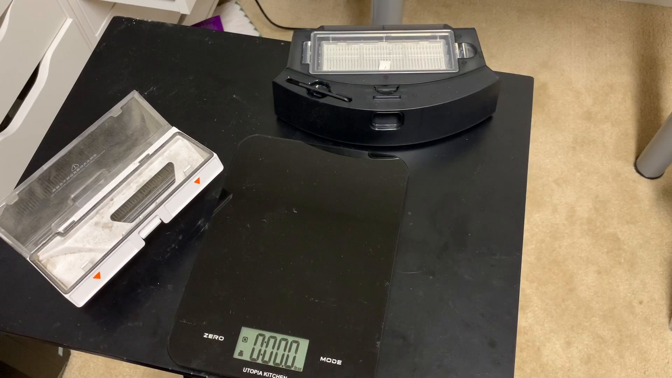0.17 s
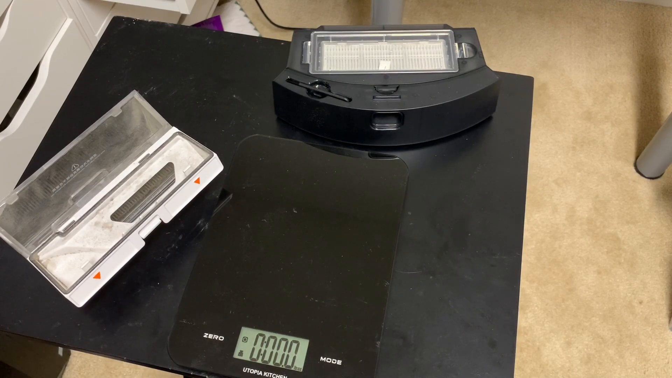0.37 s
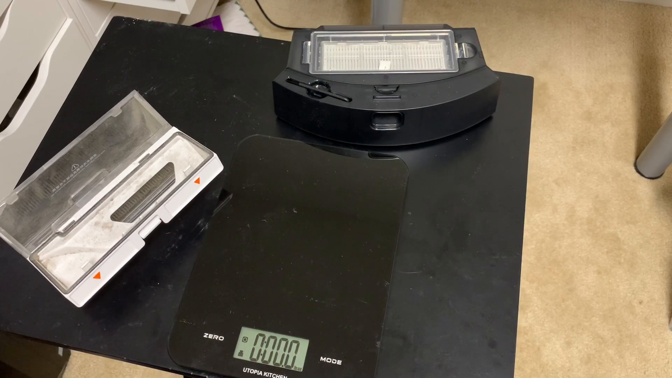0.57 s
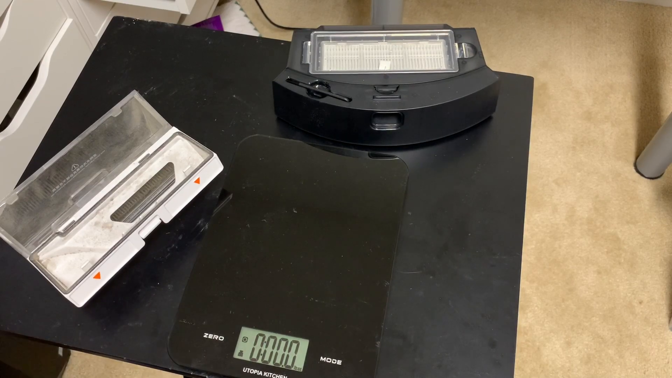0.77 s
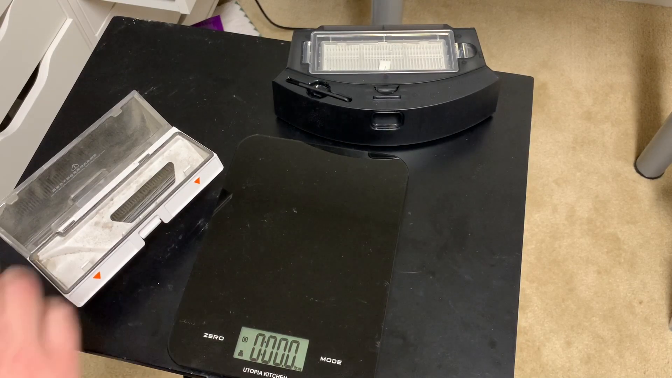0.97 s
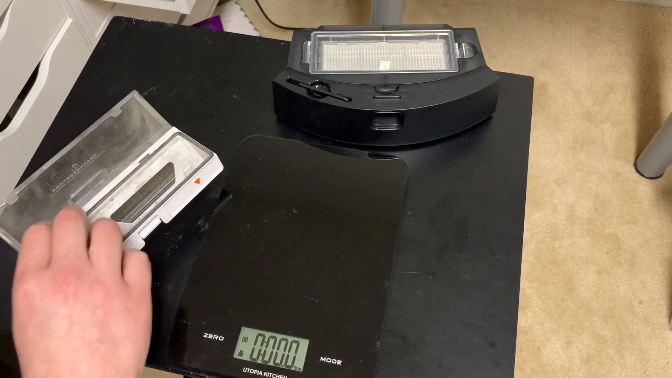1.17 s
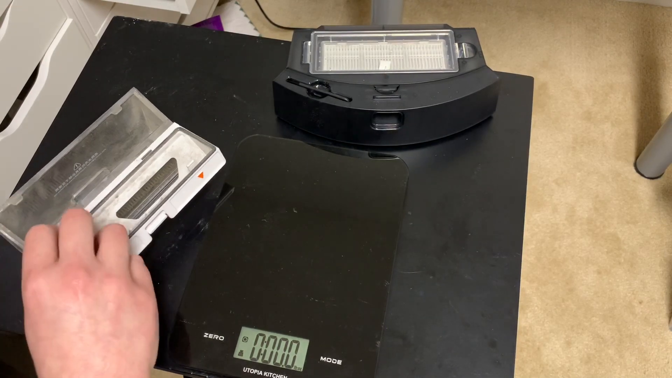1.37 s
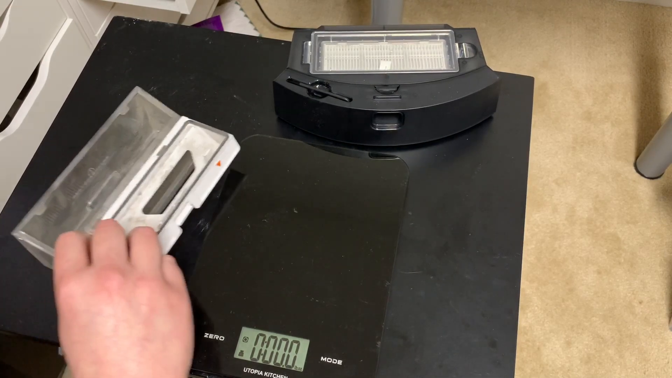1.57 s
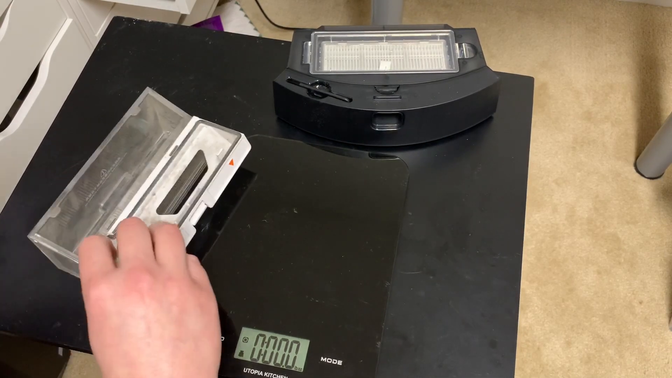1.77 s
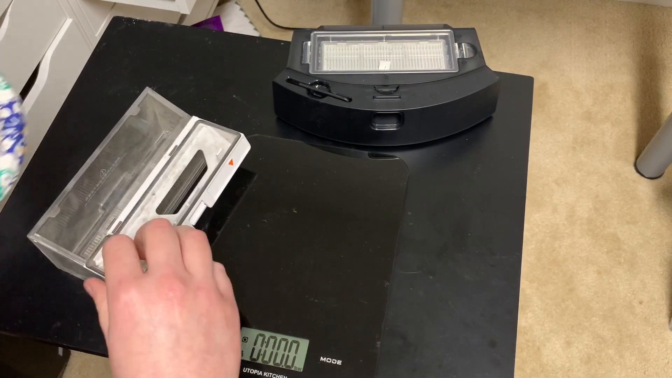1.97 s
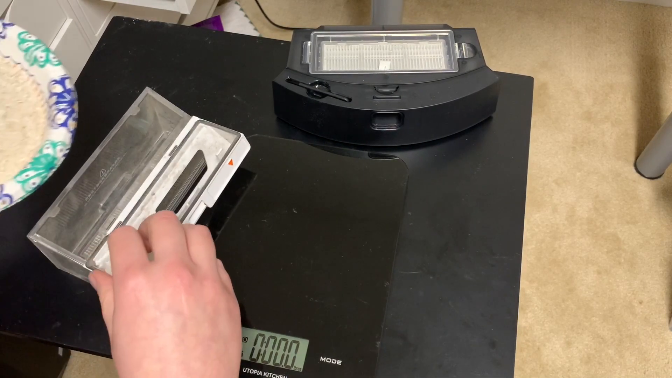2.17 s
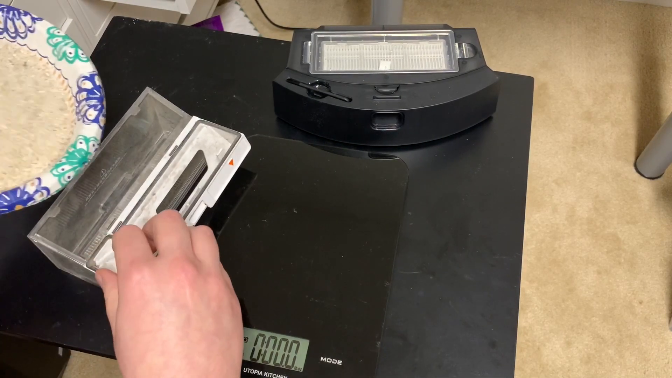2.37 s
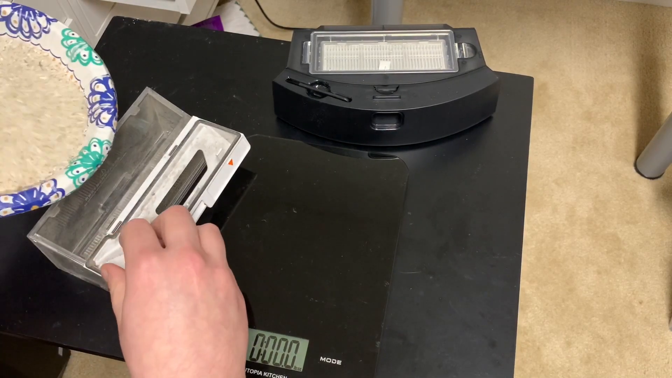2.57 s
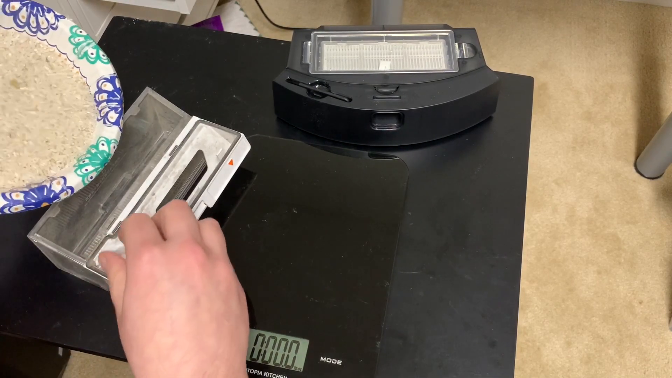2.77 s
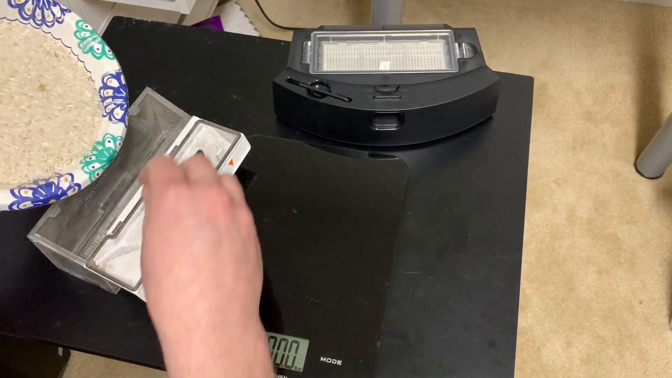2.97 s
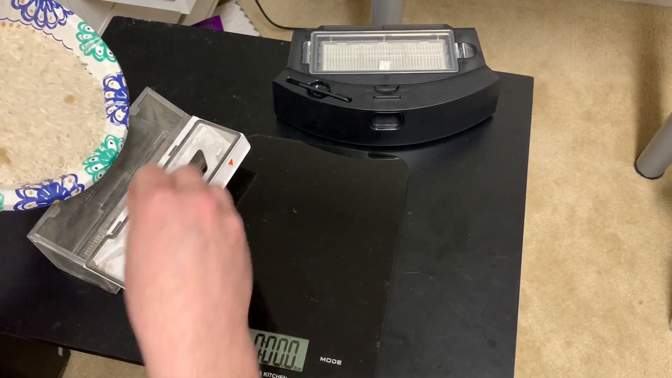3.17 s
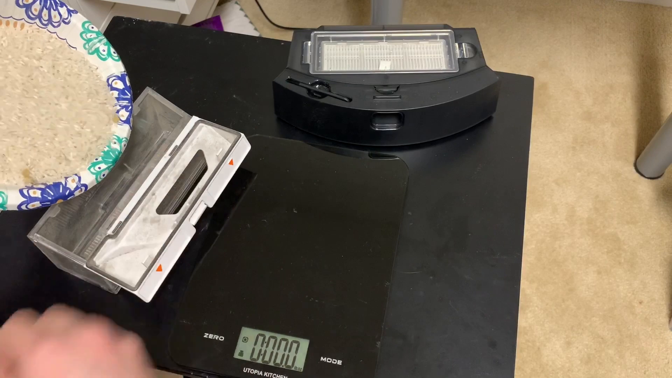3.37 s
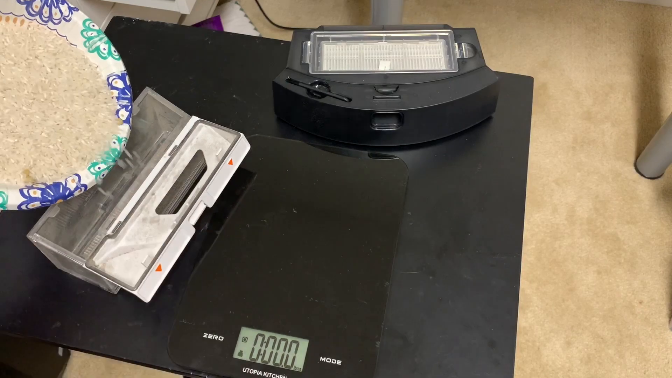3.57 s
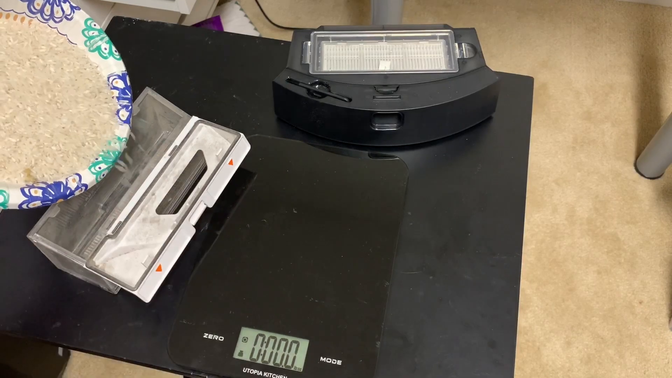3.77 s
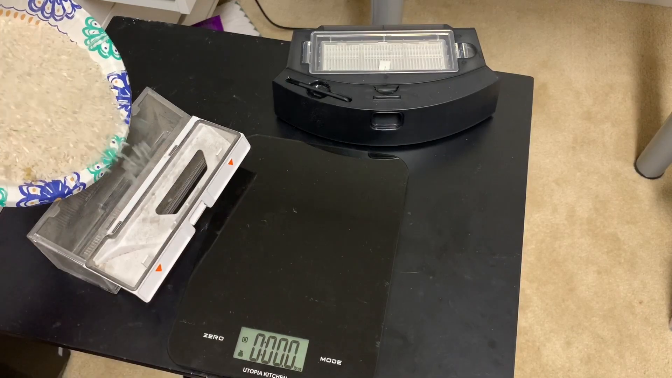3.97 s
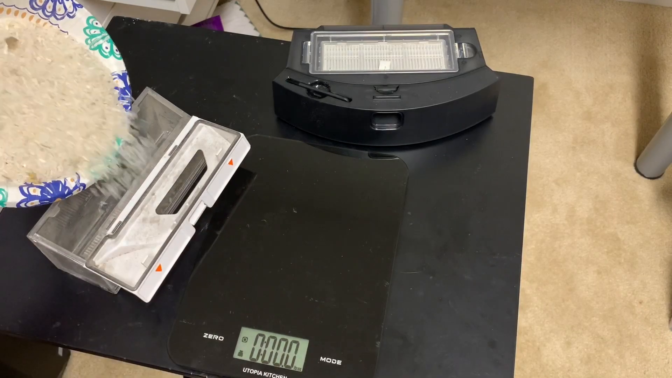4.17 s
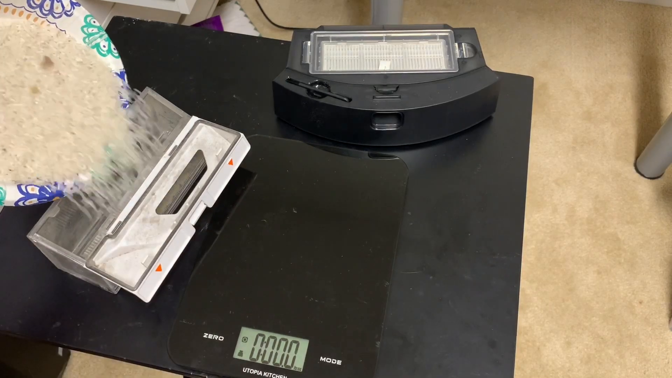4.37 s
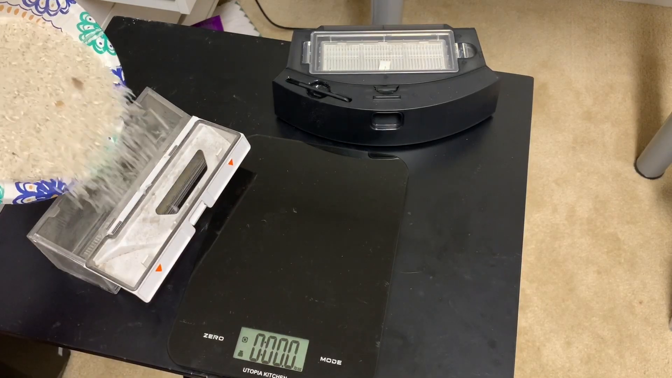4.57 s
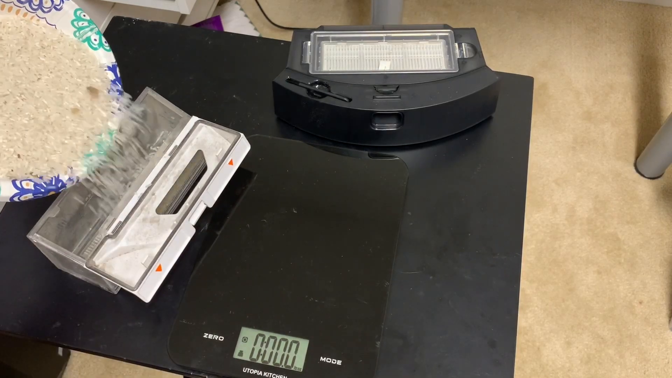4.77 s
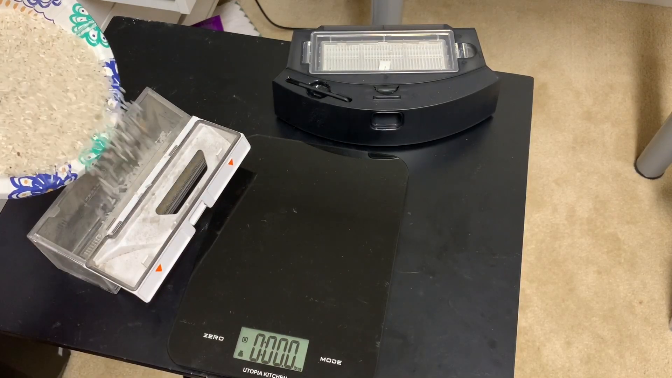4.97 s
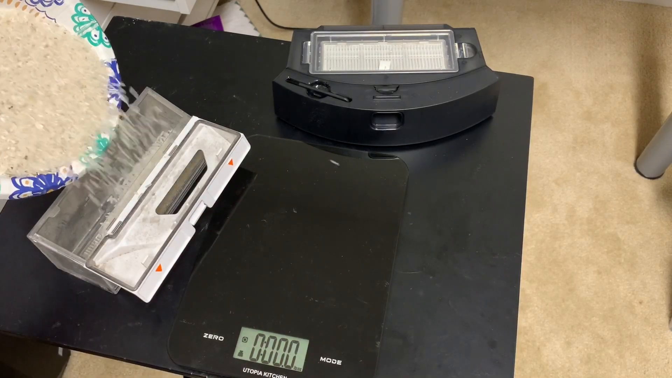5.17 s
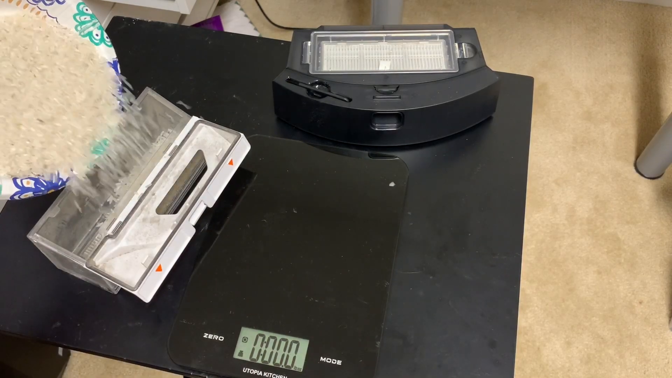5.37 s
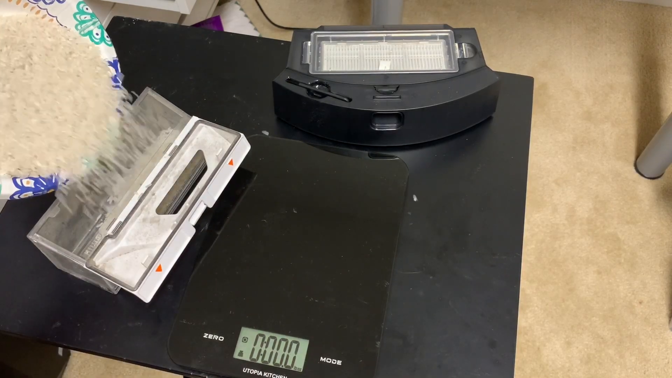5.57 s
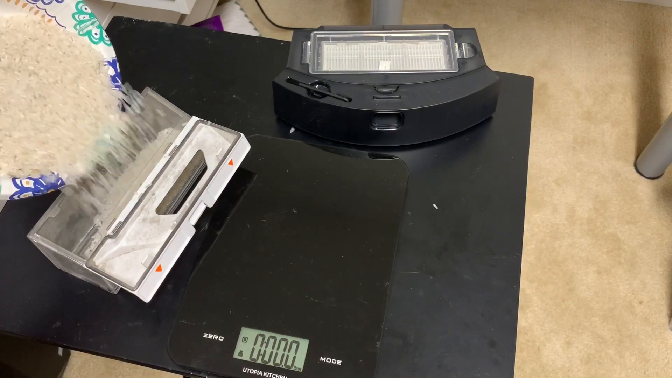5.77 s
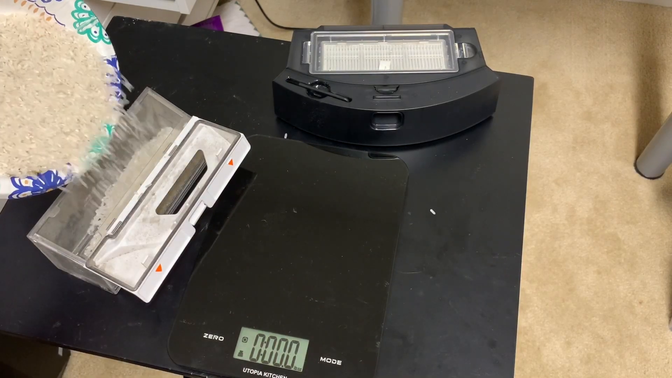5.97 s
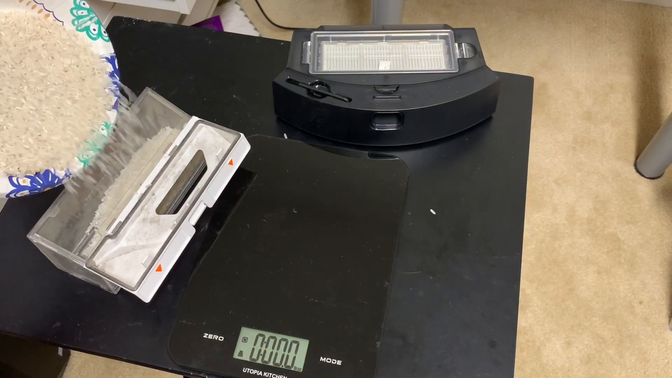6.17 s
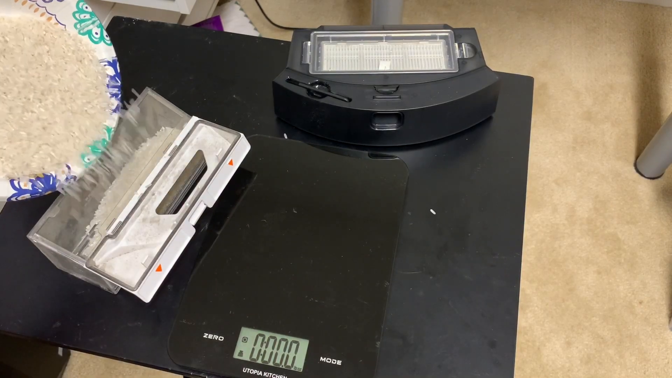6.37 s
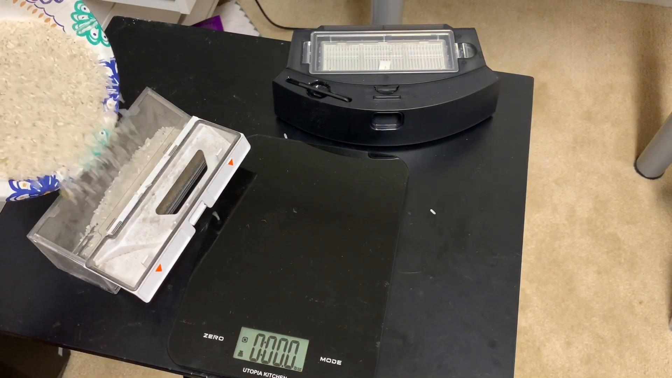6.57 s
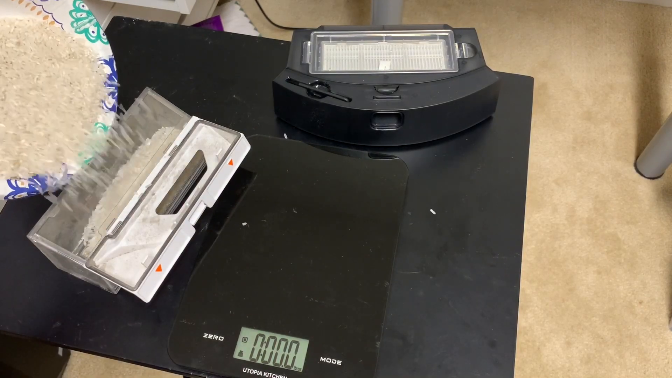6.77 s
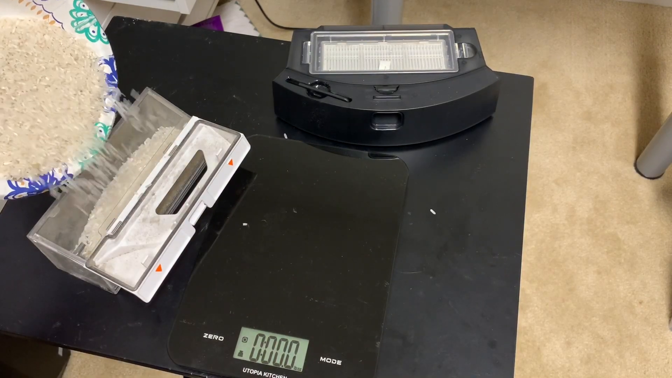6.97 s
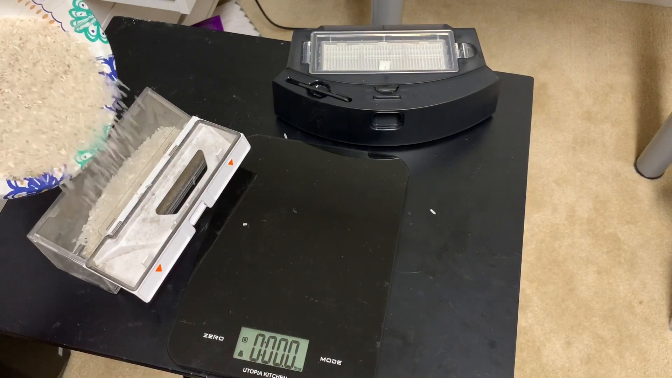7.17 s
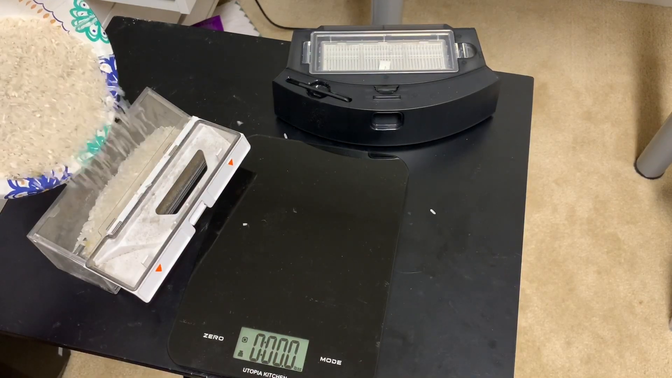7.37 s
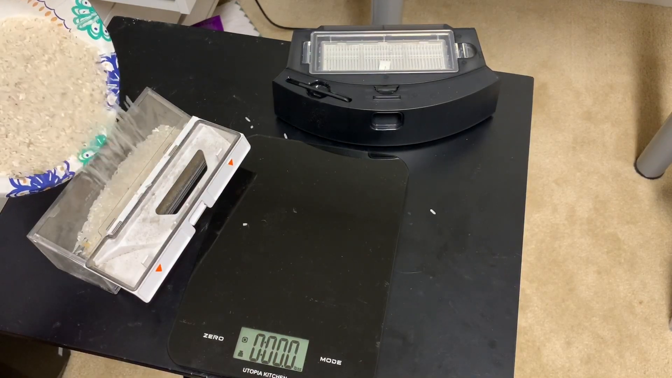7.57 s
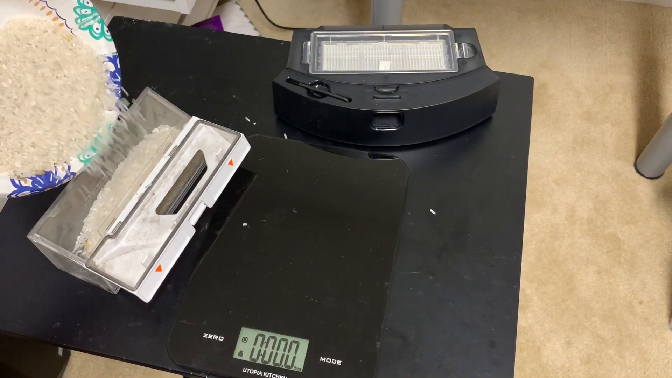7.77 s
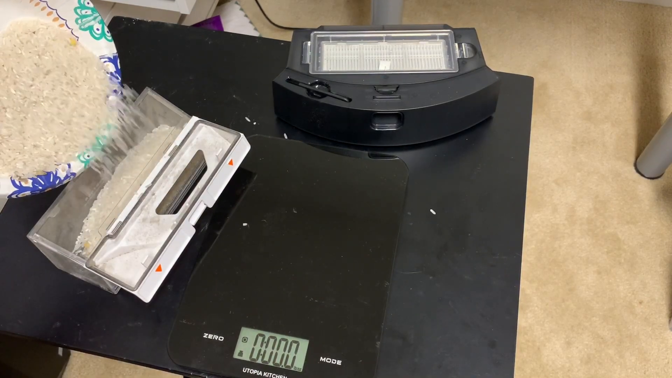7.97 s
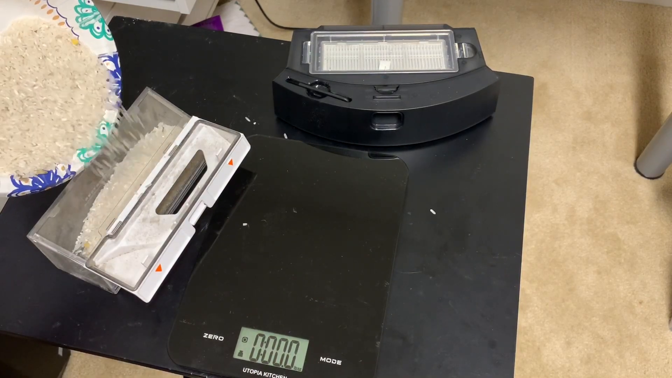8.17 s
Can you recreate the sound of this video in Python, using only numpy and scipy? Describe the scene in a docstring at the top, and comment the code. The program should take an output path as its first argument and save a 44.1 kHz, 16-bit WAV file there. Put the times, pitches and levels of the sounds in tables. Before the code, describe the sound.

In a quiet room with faint low rumble, soft rubbing and dull thuds lead to a plastic bin being dragged and bumped on a table, with a short lid creak. Rice then shifts crisply on a paper plate and spills into the empty bin, ringing its hollow plastic before swelling into a dense hiss and thinning to uneven bright ticks. Close stereo pickup from above.

```python
"""Low room rumble and hum; a hand slides a small plastic bin across a table, then tips in a paper plate of dry rice.
Grains shift on the plate, ring the empty bin, then hiss onto the growing heap; single clear grains tick.
Slips, grains and blows are clicks or noise bursts, shaped by resonances and spectra; the room is noise and sines.
A phone with two microphone ports listens from above: sources are pairs (common part, part differing between ports).
Table levels are relative dB: each player adds its own trim."""
import sys
import numpy as np
from scipy import signal
from scipy.fft import rfft, irfft, next_fast_len
from scipy.io import wavfile
from scipy.ndimage import uniform_filter1d, map_coordinates

SR = 44100
rng = np.random.default_rng(int(sys.argv[2]) if len(sys.argv) > 2 else 0)


def dump_mix(stems):
    """Bounce the given channels to the path in sys.argv[1] as a 16-bit WAV at rate SR."""
    frames = np.atleast_2d(stems).T  # one column per channel
    limited = np.clip(frames, -1, 1)  # hard clip at full scale
    pcm = np.round(limited * 32767).astype(np.int16)
    wavfile.write(sys.argv[1], SR, pcm)


N = 362061


def amp(db):
    """Gain of a level in dB."""
    return 10 ** (np.asarray(db) / 20)


def unit(x):
    """x at rms 1."""
    return x / np.sqrt(np.mean(x ** 2) + 1e-20)


def ramp(t, start, end):
    """0 before start, 1 after end."""
    return np.clip((t - start) / (end - start), 0, 1)


def along(points, hz):
    """Interpolate (freq_hz, value) points on a log frequency axis."""
    point_hz, value = np.transpose(points)
    return np.interp(np.log(hz + 1), np.log(point_hz + 1), value)


def curves(rows):
    """One value per sample for each column after the time, held outside the table."""
    time_s, *columns = np.transpose(rows)
    return [np.interp(np.arange(N) / SR, time_s, column) for column in columns]


def wobble(rate_hz, step=64):
    """Smooth random curve with rate_hz random knots a second."""
    at = np.arange(0, N + step, step)
    knots = rng.standard_normal(int(N * rate_hz / SR) + 4)
    return np.interp(np.arange(N), at, map_coordinates(knots, [at * rate_hz / SR]))


def filtered(x, response):
    """x times a complex response of frequency."""
    size = next_fast_len(N + 8192)
    return irfft(rfft(x, size) * response(np.fft.rfftfreq(size, 1 / SR)), size)[..., :N]


def coloured(x, spectrum):
    """x given a (freq_hz, gain_db) spectrum, at rms 1."""
    return unit(filtered(x, lambda hz: amp(along(spectrum, hz))))


def resonant(x, modes, size=8192):
    """x through (freq_hz, width_hz, gain_db) resonances of alternating sign."""
    hz = np.fft.rfftfreq(size, 1 / SR)
    response = 0
    for k, (centre_hz, width_hz, db) in enumerate(modes):
        damping = 1j * hz * width_hz
        response = response + (-1) ** k * amp(db) * damping / (centre_hz ** 2 - hz ** 2 + damping)
    return signal.oaconvolve(x, irfft(response)[None], axes=1)[:, :x.shape[1]]


def struck(x, spectrum, size=4096):
    """Hits given a minimum-phase colour, so that nothing rings before the blow."""
    cepstrum = irfft(np.log(amp(along(spectrum, np.fft.rfftfreq(size, 1 / SR)))))
    cepstrum[1:size // 2] *= 2
    cepstrum[size // 2 + 1:] = 0
    return signal.oaconvolve(x, irfft(np.exp(rfft(cepstrum)))[None], axes=1)[:, :x.shape[1]]


def bursts(s, db, t60_s, size=256):
    """A pair of decaying noise bursts per time, equal in energy before gain; size 1 makes clicks."""
    noise = rng.standard_normal((len(s), 2, size))
    noise *= amp(-60 * np.arange(size) / SR / np.reshape(t60_s, (-1, 1, 1)))
    noise *= amp(db)[:, None, None] / np.linalg.norm(noise, axis=2, keepdims=True)
    at = (np.round(s * SR).astype(int)[:, None] + np.arange(size)).ravel()
    return np.array([np.bincount(at, noise[:, k].ravel(), N + size)[:N] for k in range(2)])


def shower(spread_db, t60_s, rows, count):
    """Grains at random moments while a table lasts, few much louder than the rest; locally rms 1."""
    s = rng.uniform(rows[0][0], min(rows[-1][0], (N - 1) / SR), count)
    size_db = spread_db[(s * SR).astype(int)] * np.minimum(rng.exponential(size=count), 3.0)
    x = bursts(s, size_db, t60_s, size=192)
    return x / np.sqrt(np.abs(uniform_filter1d(np.mean(x ** 2, 0), SR // 8)) + 1e-9)


def patchy(x, depth_db):
    """Random patches of gain in time and frequency, at rms 1."""
    z = signal.stft(x, nperseg=512)[2]
    field = uniform_filter1d(rng.standard_normal(z.shape[1:]), size=3, axis=0)
    field = uniform_filter1d(field, size=5, axis=1)
    return unit(signal.istft(z * amp(depth_db * unit(field)), nperseg=512)[1][:, :x.shape[1]])


POUR_S, POUR_FADE_S = 3.19, 0.54  # first grains leave the plate; crossfade to the bin


def landing(x, on_plate, in_bin):
    """Grains take the plate's colour until the pour starts, then fade to the bin's."""
    falling = ramp(np.arange(N) / SR, POUR_S, POUR_S + POUR_FADE_S)
    return struck((1 - falling) * x, on_plate) + struck(falling * x, in_bin)


# room rumble: time_s, level_db
RUMBLE_LEVEL = [(0, -73), (.1, -69), (.3, -69.5), (.54, -71.5), (.68, -69.5), (.77, -67), (.95, -71),
                (1.02, -74), (1.1, -68), (1.35, -73.5), (1.5, -75), (1.65, -67), (2.67, -67.5), (2.73, -71),
                (3.05, -77), (3.4, -68.5), (4.0, -72), (4.3, -75), (8.21, -78)]
# spectra of rumble and air hiss: freq_hz, gain_db
RUMBLE_SPECTRUM = [(20, -18), (40, 1.5), (65, 2.5), (110, -5), (200, -6.5), (350, -10), (700, -42)]
AIR_SPECTRUM = [(200, 1.5), (500, 4), (900, -2.5), (1500, -4.5), (2500, -5), (5000, -17), (10000, -14.5),
                (16000, -21)]
HUM_HZ, WHINE_HZ = 59.8, 15624
AIR_WAVER_DB = 2.2


def room():
    """House rumble in lumps, mains hum, faint air hiss, thin electric whine: noise and wavering sines."""
    rumble_db, = curves(RUMBLE_LEVEL)
    t = np.arange(N) / SR
    rumble = amp(2.6 * wobble(8)) * coloured(rng.standard_normal((2, N)), RUMBLE_SPECTRUM)
    hum = amp(-7.5 + 1.4 * wobble(3.5)) * np.sin(2 * np.pi * HUM_HZ * t + 0.46 * wobble(3.16))
    hiss = amp(-77.0 + AIR_WAVER_DB * wobble(13)) * coloured(rng.standard_normal((2, N)), AIR_SPECTRUM)
    whine = amp(-86.0 + 1.4 * wobble(4.9)) * np.sin(2 * np.pi * WHINE_HZ * t + 1.3 * wobble(45))
    common_only = [[1], [0]]
    return amp(rumble_db) * (rumble + hum * common_only) + hiss + whine * common_only


# strokes of hand and sleeve: start_s, length_s, level_db, bright_db, squeal_db (both re level), squeal_hz
STROKES = [(0.05, 0.22, -69.5, -7.5, -1, 1920), (0.26, 0.16, -77, -7, 6.5, 1930),
           (0.418, 0.095, -76.5, -8, -2, 2100), (0.502, 0.31, -79, -25, 2, 1500),
           (0.701, 0.11, -78.5, -34, 3, 1920), (0.79, 0.16, -67.5, -14, 3.5, 1960),
           (1.227, 0.2, -65.5, -7, -23, 2400), (1.39, 0.33, -63, -1, 1, 2300),
           (1.606, 0.27, -70, -1.5, -1, 2300), (0.9, 0.11, -84, -6, -4, 2100),
           (1.9, 0.084, -81, -18, -5, 2300), (2.047, 0.16, -72, -5, -14, 2300)]
# rubbing spectra, main, bright and low drag: freq_hz, gain_db
CLOTH = [(400, -25), (1300, -10), (1900, -1), (2400, 4), (3000, -2), (3700, -3.5), (5200, -13), (7000, -61)]
CLOTH_HIGH = [(2500, -31), (4000, -7.5), (6000, 1.5), (7800, -6), (9000, 0), (10500, -4.5), (13000, -9),
              (16000, -12.5)]
CLOTH_LOW = [(200, -1), (500, -7), (1100, 4), (1600, -13), (2200, -58)]
STROKE_EDGE_DB = 17.5  # a stroke's ends lie this far under its middle
DRAG_DB = -7  # low drag re main rub
SQUEAL_WIDTH_HZ = 55


def hand():
    """Skin and cloth rub in clumps of tiny slips; the slips ring the dragged bin's edge."""
    start_s, length_s, db, bright_db, squeal_db, squeal_hz = np.transpose(STROKES)[:, :, None]
    end = round((start_s + 2 * length_s).max() * SR)
    place = 2 * (np.arange(end) / SR - start_s) / length_s - 1  # -1 start, 1 end
    strokes = amp(db - STROKE_EDGE_DB * place ** 2)
    slips = shower(np.full(N, 2.5), 0.057, [(0,), (end / SR,)], count=4000)[:, :end]
    slips = patchy(slips, depth_db=2.5)

    def rubbed(part_db, spectrum):
        return (strokes * amp(part_db)).sum(0) * unit(struck(slips, spectrum))

    rub = rubbed(0, CLOTH) + rubbed(DRAG_DB, CLOTH_LOW) + rubbed(bright_db, CLOTH_HIGH)
    for gain, hz in zip(strokes * amp(squeal_db - 5.5), squeal_hz[:, 0]):
        rub = rub + gain * unit(resonant(slips, [(hz, SQUEAL_WIDTH_HZ, 0)], size=2048))
    return np.pad(amp(1.0) * rub, ((0, 0), (0, N - end)))


# dull thuds through the house floor: time_s, level_db
THUDS = [(0.2, -60), (0.351, -62), (0.475, -52), (0.75, -60), (0.81, -57), (1.63, -60), (3.36, -60),
         (3.53, -61), (4.0, -57)]
# house floor modes: freq_hz, width_hz, gain_db
FLOOR_MODES = [(48, 24, 0), (75, 40, -2)]


def thuds():
    """Clicks ring the low modes of the house floor."""
    s, db = np.transpose(THUDS)
    return resonant(bursts(s, db + 51.5, 1, size=1), FLOOR_MODES)


# bin and fingers bumping the table: time_s, level_db, bright_db (re level), ring_t60_s
BUMPS = [(0.712, -49, -12, 0.2), (0.794, -50, -13, 0.17), (0.88, -51, -13, 0.098),
         (1.028, -48.5, -17.5, 0.33), (1.496, -45.5, -27, 0.18), (1.92, -53, -14, 0.15),
         (2.5647, -45.5, -15, .03), (3.123, -52.5, -11, 0.039)]
# table modes: freq_hz, width_hz, gain_db
TABLE_MODES = [(160, 37, 4.5), (248, 104, 5.5), (343.5, 22, 8.5), (470, 57, -3), (890, 70, -7.5),
               (1490, 61, -13)]
# crack of the bin: freq_hz, gain_db
CRACK_SPECTRUM = [(300, -12), (900, 10.5), (1500, 8), (2500, 8), (3500, -5), (5500, -35)]


def bumps():
    """A click and a decaying burst ring the table; shorter bursts crack on the bin."""
    s, db, bright_db, t60_s = np.transpose(BUMPS)
    blow = bursts(s, db + 30.5, 1, size=1) + bursts(s, db + 31, t60_s, size=8192)
    crack = bursts(s, db + bright_db + 23.5, 0.0092, size=1024)
    crack = crack + bursts(s, db + bright_db + 21.5, 0.4 * t60_s, size=4096)
    return resonant(blow, TABLE_MODES) + struck(crack, CRACK_SPECTRUM)


# lid creaks: time_s, level_db, pitch_hz
CREAKS = [(1.126, -63.5, 1060), (1.232, -68, 1130), (1.299, -60, 1080), (1.308, -57.5, 1090)]


def creaks():
    """The lid creaks: decaying noise rings two modes as short smeared notes."""
    x = np.zeros((2, N))
    size = SR // 10
    for s, db, hz in CREAKS:
        rub = rng.standard_normal((2, size)) * amp(db + 15.5 - 60 * np.arange(size) / SR / 0.1)
        x[:, round(s * SR):][:, :size] += resonant(rub, [(hz, 60, 4), (1.59 * hz, 120, -1)])
    return x


# single clear grain ticks, on the plate, then in the filling bin: time_s, level_db, dull_knock_db (re level)
TICKS = [(1.852, -52, -27), (2.0763, -51, -23.0), (2.241, -33.5, -15), (2.244, -45.0, -14),
         (2.2464, -40, -22.0), (2.287, -37, -20.0), (2.296, -29, -19), (2.301, -35.0, -24.0),
         (2.31, -26.5, -19.0), (2.3413, -23, -24.0), (2.3458, -31, -25.0), (2.3518, -27, -22),
         (2.357, -20.5, -23), (2.3937, -25, -10), (2.4395, -21, -21.0), (2.4424, -22, -22.0),
         (2.4545, -23, -26.0), (2.479, -26, -27.0), (2.4815, -27.0, -31.0), (2.5264, -33, -24.0),
         (2.5985, -27, -25), (2.6167, -26, -17.0), (2.629, -25, -20), (2.636, -26, -21.0),
         (2.664, -30, -21.0), (2.6722, -30, -15.0), (2.6966, -33, -20.0), (2.7318, -35, -17.0),
         (2.738, -35, -0.5), (2.7493, -37, -19), (2.7796, -39.0, -26.0), (2.781, -32, -22.0),
         (2.7868, -29, -20.0), (2.7964, -28.5, -21), (2.8579, -39.5, -27.0), (2.9041, -29, -18.0),
         (2.914, -34, -11), (2.936, -30.5, -22.0), (2.963, -27, -24.0), (2.9725, -45, -21.0),
         (2.9861, -31, -22.0), (3.0052, -25.5, -17), (3.0095, -34, -22.0), (3.012, -26, -23.0),
         (3.016, -33, -14), (3.0354, -26, -14), (3.0762, -29, -18), (3.1001, -43, -19.0),
         (3.1315, -35, -16.0), (3.256, -30.5, -23.0), (3.262, -37, -24.0), (3.3225, -37.0, -28.0),
         (3.3321, -35, -29), (3.39, -36, -18.0), (3.397, -31.5, -30.0), (3.401, -32, -31),
         (3.4293, -28.5, -22.0), (3.4647, -49, -17.0), (3.4821, -36.5, -28), (3.4844, -33, -19),
         (3.491, -29, -6), (3.5, -32, -16), (3.5315, -27, -22), (3.5406, -27, -25.0), (3.693, -18, -20),
         (3.774, -23, -28), (3.8343, -23, -28), (3.9228, -31, -31.0), (3.9867, -15.5, -24),
         (4.064, -18.5, -12), (4.073, -19, -23.0), (4.1628, -23, -25), (4.1748, -21, -25),
         (4.1821, -22, -25), (4.2107, -21, -25), (4.2219, -20, -25), (4.2587, -9.5, -10.5),
         (4.28, -16, -14), (4.287, -20, -25), (4.2973, -11, -14), (4.3094, -24, -25), (4.3239, -20, -25),
         (4.3296, -16.5, -29), (4.3444, -20, -24.0), (4.359, -21, -30.0), (4.3845, -22, -26),
         (4.391, -17, -26), (4.4049, -20, -26), (4.4112, -15, -26), (4.424, -20, -26), (4.4268, -17, -26),
         (4.4448, -8.5, -17), (4.45, -18, -26), (4.46, -18, -23), (4.4663, -21, -26), (4.477, -15, -31.0),
         (4.482, -17, -28), (4.4906, -13, -26), (4.505, -16, -28), (4.5111, -13, -32.0),
         (4.5144, -17, -28.0), (4.5272, -20, -28), (4.5328, -12, -22), (4.5393, -16, -28),
         (4.547, -22, -28), (4.5504, -18, -34.0), (4.5524, -16, -25), (4.5717, -26, -28),
         (4.5832, -24, -28), (4.6045, -25, -30.0), (4.6101, -25, -28), (4.6161, -20, -26.0),
         (4.627, -14.5, -27), (4.6312, -18, -25.0), (4.634, -25, -25.0), (4.655, -19, -20),
         (4.657, -19, -18), (4.67, -14, -21), (4.681, -20, -26), (4.6963, -10.5, -22), (4.7085, -17, -26),
         (4.7112, -22, -24.0), (4.7357, -13, -25), (4.7402, -13, -29), (4.761, -16, -28.0),
         (4.7696, -14, -35.0), (4.79, -18, -22.0), (4.8088, -11, -20), (4.8312, -14.5, -16),
         (4.838, -22, -26), (4.842, -22, -31), (4.875, -20.5, -24), (4.8815, -24, -26),
         (4.9254, -17, -31.0), (4.9412, -20.5, -23.0), (4.96, -16, -27), (4.9753, -11.5, -22),
         (4.983, -35, -22.0), (4.989, -17, -33), (4.992, -18, -18), (5.042, -17, -28.0), (5.044, -20, -27),
         (5.0525, -25, -29.0), (5.0605, -13, -32), (5.0633, -19, -25), (5.0802, -16, -29),
         (5.1053, -20.0, -25.0), (5.114, -18, -31.0), (5.116, -16, -34.0), (5.1258, -21, -32.0),
         (5.1442, -12.5, -24), (5.1676, -17, -22), (5.175, -10, -21), (5.1765, -19, -27.0),
         (5.1863, -17, -27), (5.199, -21, -30), (5.2007, -24, -30), (5.2406, -20, -33.0),
         (5.2556, -20.5, -30), (5.282, -14, -34), (5.3317, -18.5, -25.0), (5.3359, -21.5, -14),
         (5.3497, -21, -30), (5.3672, -15, -30), (5.3753, -19, -27), (5.392, -18, -36.0),
         (5.4176, -17.5, -24), (5.4252, -19.0, -30.0), (5.432, -14, -28.0), (5.4597, -9, -24),
         (5.4907, -15.5, -30), (5.5625, -10.5, -30), (5.565, -12.5, -26.0), (5.5866, -8.5, -29),
         (5.6172, -15.5, -39.0), (5.6303, -19.0, -30.0), (5.637, -14, -30.0), (5.646, -14, -33.0),
         (5.654, -17, -31.0), (5.6628, -19, -33.0), (5.6738, -12, -24), (5.6775, -16, -12),
         (5.722, -18, -32.0), (5.747, -23, -31.0), (5.754, -18, -25), (5.7752, -16.5, -31.0),
         (5.793, -22, -37.0), (5.7955, -16, -27.0), (5.8, -22, -30), (5.829, -22, -30),
         (5.8364, -13.5, -34.0), (5.8583, -12.5, -32), (5.894, -18.5, -38), (5.9721, -13, -39),
         (6.0028, -13.5, -35.0), (6.042, -24, -34.0), (6.1986, -28, -33.0), (6.248, -29, -22.0),
         (6.4367, -14.5, -36), (6.5095, -28.5, -10), (6.568, -31.5, -18), (6.572, -17.5, -33.0),
         (6.608, -14, -35.0), (6.6435, -30, -26.0), (6.6461, -20.5, -25.0), (6.6513, -30.5, -22),
         (6.6733, -17.5, -31.0), (6.717, -16.5, -35.0), (6.792, -27, -27.0), (6.799, -21, -28.0),
         (6.802, -13.0, -30.0), (6.8166, -29.0, -30.0), (6.863, -18.5, -32.0), (6.8695, -19, -27.0),
         (6.885, -14.5, -30), (6.904, -16, -31), (6.9068, -22, -32), (6.922, -16.5, -36.0),
         (6.941, -28, -33.0), (6.952, -23, -26.0), (6.954, -14, -31.0), (6.97, -18.5, -18),
         (7.044, -29, -23.0), (7.0768, -32, -20), (7.0786, -10, -29), (7.1808, -13.5, -28),
         (7.1855, -16.5, -34.0), (7.206, -19, -32.0), (7.212, -24, -34.0), (7.223, -21, -37.0),
         (7.2375, -16, -39), (7.2434, -30, -30.0), (7.247, -21, -35.0), (7.2649, -25, -30),
         (7.2858, -16, -38), (7.2914, -19, -35), (7.3159, -26.0, -22.0), (7.3182, -10.5, -38),
         (7.324, -28.0, -10), (7.3352, -23, -30), (7.359, -14, -37), (7.4913, -40, -32),
         (7.521, -28.5, -28.0), (7.553, -32, -17.0), (7.557, -21, -36.0), (7.6081, -34, -12),
         (7.695, -42, -15), (7.761, -35, -18.0), (7.84, -32, -22.0), (7.89, -19, -32.0), (7.8951, -14, -35),
         (7.953, -17.5, -28.0), (8.064, -30, -13), (8.16, -41, -20.0), (8.1975, -42, -28.0)]
# grain spectra, on the plate, in the bin, dull knock: freq_hz, gain_db
PAPER_SPECTRUM = [(1500, -22.5), (2500, -8), (4000, -10), (6000, -9), (8500, 3.5), (11000, -3.5),
                  (14000, -9), (17000, -16)]
BIN_TICK_SPECTRUM = [(3000, -37.5), (6100, -11), (6450, -11), (6900, -1.5), (7500, -20), (8400, -2),
                     (9100, 6), (9500, -1), (9900, 2), (10800, -3.5), (11700, 0), (12600, -4.5),
                     (14200, -11.5), (17000, -11.5)]
KNOCK_SPECTRUM = [(800, -81), (2500, -21), (4500, 6.5), (6500, -7), (9000, -51)]
# echoes off table and bin wall: delay_s, gain_db
ECHOES = [(.00072, -7), (.0018, -12)]
ECHO_SCATTER = 0.22  # share by which delays differ with the landing spot
PAPER_SOFTENS_DB = -4.5  # click on the plate re click in the bin
KNOCK_T60_S, NEAR_T60_S, FAR_T60_S = .014, .011, .06  # decay rates; bursts are cut short


def ticks():
    """Each grain: a click, its echoes, a short scattered tail and a duller knock."""
    s, db, knock_db = np.transpose(TICKS)
    spot = 1 + ECHO_SCATTER * rng.standard_normal((len(s), len(ECHOES)))
    clicks = [(s, db)]
    for k, (delay_s, loss_db) in enumerate(ECHOES):
        clicks.append((s + delay_s * spot[:, k], db + loss_db))
    paper_db = PAPER_SOFTENS_DB * (s < POUR_S)
    snap = sum(bursts(at_s, click_db + 14.0 + paper_db, 1, size=1) for at_s, click_db in clicks)
    tail = bursts(s, db + 8.5, NEAR_T60_S) + bursts(s, db + 4, FAR_T60_S, size=640)
    knock = struck(bursts(s, db + knock_db + 18.0, KNOCK_T60_S), KNOCK_SPECTRUM)
    return landing(snap + tail, PAPER_SPECTRUM, BIN_TICK_SPECTRUM) + knock


# rice in motion, sliding on the plate, then pouring: time_s, stream_db, patter_db
RICE = [(2.2, -113, -92), (2.25, -66, -91), (2.28, -71, -85), (2.3, -58, -85), (2.35, -55, -48.5),
        (2.42, -51, -45.5), (2.47, -51.5, -49.5), (2.53, -52.5, -44), (2.7, -60.5, -64), (2.78, -64.5, -62),
        (2.855, -73.5, -70), (2.875, -66, -86), (2.92, -56, -75), (2.97, -62.5, -85), (3.07, -53, -64),
        (3.22, -54.5, -48), (3.34, -59.5, -63), (3.54, -57, -59), (3.62, -47, -43), (3.67, -54.5, -75),
        (3.72, -49, -51), (3.921, -55, -52), (3.94, -49, -50.5), (4.41, -40.5, -35), (4.59, -47, -40),
        (4.69, -44, -45), (4.76, -49, -42.5), (5.36, -49.5, -49.5), (5.7, -46.5, -42.5), (5.73, -49, -40.5),
        (6.12, -52.5, -55), (6.45, -53.5, -63), (6.72, -50.5, -54.5), (7.17, -51.5, -54),
        (7.61, -55.5, -66), (7.96, -51.5, -58), (8.21, -57.5, -63)]
# stream spectra, on plate, in bin: freq_hz, gain_db
PLATE_SPECTRUM = [(300, -21), (600, -19.5), (950, -8), (1500, -14), (1900, -10), (2300, -1), (2800, -4.5),
                  (3450, 1), (4300, -5.5), (6000, -5), (8500, -1.5), (12000, -7), (17000, -26)]
STREAM_SPECTRUM = [(150, -55), (350, -13.5), (600, -22.5), (1000, -12), (1800, -13), (2500, -8), (3400, -7),
                   (4200, -5), (4800, -2.5), (5600, -4), (6600, -1.5), (8300, -0.5), (12000, -5.5),
                   (17000, -11)]
LOUD_SPREAD_DB, STREAM_SHARE = 2, .4  # spread of grain loudness; the stream's share of it
SURGE_DB, PATTER_SURGE_DB = 1.2, 2.5  # unevenness in time
STREAM_PATCH_DB = 2.0  # unevenness of colour
GRAIN_T60_S = .011  # decay rate; bursts are cut short


def rice():
    """A dense stream of grains and a sparser patter of bright ticks."""
    stream_db, patter_db = curves(RICE)
    spread_db = np.full(N, LOUD_SPREAD_DB)
    dense = shower(STREAM_SHARE * spread_db, GRAIN_T60_S, RICE, count=8000)
    dense = patchy(dense, depth_db=STREAM_PATCH_DB)
    stream = unit(landing(dense, PLATE_SPECTRUM, STREAM_SPECTRUM))
    sparse = shower(spread_db, GRAIN_T60_S, RICE, count=3000)
    patter = unit(landing(sparse, PAPER_SPECTRUM, BIN_TICK_SPECTRUM))
    stream_gain = amp(stream_db + 5.5 + SURGE_DB * wobble(13))
    patter_gain = amp(patter_db + 1.5 + PATTER_SURGE_DB * wobble(24))
    return stream_gain * stream + patter_gain * patter


# grains on the bin floor as the heap covers it: time_s, bare_ring_db, hollow_db
DRUM = [(3.385, -82, -82), (3.41, -71, -65), (3.5, -64, -73), (3.56, -56, -63.5), (3.73, -49.5, -58.5),
        (3.85, -50.5, -67), (3.91, -58, -65), (3.99, -48.5, -59), (4.17, -48.5, -56), (4.3, -54, -52),
        (4.5, -56, -55), (4.65, -67.5, -61.5), (5.05, -73, -73), (5.68, -63.5, -65), (6.2, -71.5, -76),
        (8.21, -73, -72.5)]
# modes of empty bin, air inside it, loaded floor: freq_hz, width_hz, gain_db
BIN_MODES = [(522, 22, -9), (673, 16, -4), (1345, 28, 5), (1385, 36, 4), (1620, 300, -11), (1972, 24, -10),
             (2488, 24, -6), (2960, 80, -10), (4085, 50, -9), (4720, 120, -11)]
HOLLOW_MODES = [(900, 225, 0), (1180, 196, 3)]
HEAP_MODES = [(321, 113, 1), (486, 26, 1.5)]
HEAP_THUD_DB = -21.5  # re stream
HEAP_START_S, HEAP_END_S = 4, 5.4  # heap thud fades in
RING_PATCH_DB = 2.0  # unevenness of the ring's colour


def drumming():
    """Hard grains ring the bin until the heap damps it; soft ones boom in its air and thud on the heap."""
    bare_db, hollow_db = curves(DRUM)
    with np.errstate(divide="ignore"):  # silent before the heap
        growth_db = 20 * np.log10(ramp(np.arange(N) / SR, HEAP_START_S, HEAP_END_S))
    heap_db = curves(RICE)[0] + HEAP_THUD_DB + growth_db
    hard = patchy(shower(np.full(N, 3), 0.0083, DRUM, count=2600), depth_db=RING_PATCH_DB)
    soft = shower(np.full(N, 2.5), 0.008, DRUM, count=3000)
    layers = [(bare_db - 0.5, hard, BIN_MODES),
              (hollow_db - 2.0, soft, HOLLOW_MODES),
              (heap_db, soft, HEAP_MODES)]
    return sum(amp(db + 1.43 * wobble(14)) * unit(resonant(hits, modes)) for db, hits, modes in layers)


# lone grains on the bare bin floor: time_s, level_db
STRIKES = [(3.4043, -48), (3.4512, -43), (3.4856, -41), (3.4976, -44), (3.533, -38.5), (3.553, -47),
           (3.578, -44), (3.6038, -41), (3.6432, -43), (3.662, -46), (3.6876, -47), (3.7265, -37.5),
           (3.7515, -47), (3.8373, -38), (3.9081, -54), (3.9435, -45), (4.0009, -50), (4.0289, -48),
           (4.0608, -39), (4.1221, -47), (4.1665, -41), (4.2563, -47)]
# rap on the floor: freq_hz, gain_db
RAP_SPECTRUM = [(500, -28), (1200, 1), (1500, 8), (1900, -6), (3000, -20), (5000, -22), (8000, -40)]
SPOT_DB = 2  # how much each strike favours other modes


def strikes():
    """Each lone grain clicks every bin mode at its own level, with a short noisy rap."""
    s, db = np.transpose(STRIKES)
    spot_db = SPOT_DB * rng.standard_normal((len(s), len(BIN_MODES)))
    x = struck(bursts(s, db + 14.5, 0.0071), RAP_SPECTRUM)
    for k, mode in enumerate(BIN_MODES):
        x = x + resonant(bursts(s, db + 36.5 + spot_db[:, k], 1, size=1), [mode])
    return x


# likeness of the two ports: freq_hz, correlation
ALIKE = [(60, 0.85), (500, 0.68), (1200, 0.88), (2000, 0.34), (3500, 0.62), (5500, 0.14), (6500, 0.66),
         (7500, 0.9), (8500, 1), (11500, 0.83), (13500, 1), (14800, 0.86), (16000, 0.92)]


def scene():
    """Sum the sources, then mix common and differing parts to the ports' likeness."""
    pair = rice() + drumming() + strikes() + ticks() + hand() + bumps() + creaks() + room() + thuds()

    def weights(hz):
        angle = np.arccos(np.clip(along(ALIKE, hz), -1, 1)) / 2
        return np.array([np.cos(angle), np.sin(angle)])

    common, other = filtered(pair, weights)
    return np.array([common + other, common - other])


# overall treble limit of the sound: freq_hz, gain_db
TREBLE_LIMIT = [(20, 1.5), (15700, 2), (16000, -14), (16600, -56), (17100, -42)]
# phase by which left leads: freq_hz, lead_rad
LEAD = [(0, 0), (2000, np.pi), (4500, 2 * np.pi), (6200, 2 * np.pi), (8550, np.pi), (11000, 0),
        (13300, -np.pi), (15600, -2 * np.pi)]
# left over right: freq_hz, gain_db
LOUDER = [(60, -0.5), (130, 1), (290, 0.5), (640, 4.5), (1410, 4), (3100, 0), (6820, -1), (15000, 1)]
TOP_HZ = 17140


def record(dry):
    """Treble limit, phase and level step between the ports, band limit."""
    half = np.array([[.5], [-.5]])

    def response(hz):
        level = amp(half * along(LOUDER, hz))
        phase = np.exp(1j * half * np.interp(hz, *np.transpose(LEAD)))
        return level * phase * amp(along(TREBLE_LIMIT, hz)) * (hz < TOP_HZ)

    return filtered(dry, response)


dry = scene()
out = record(dry)
dump_mix(out)
```